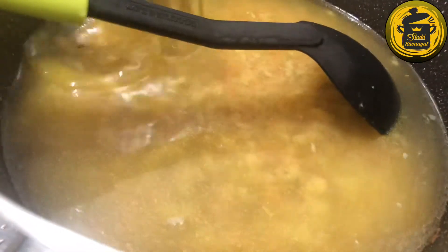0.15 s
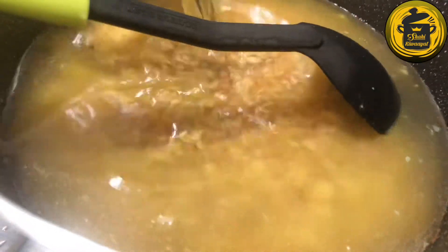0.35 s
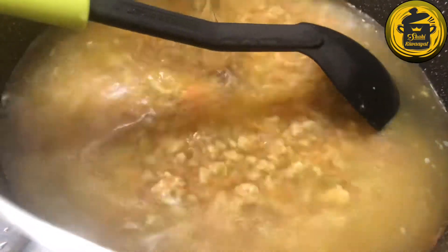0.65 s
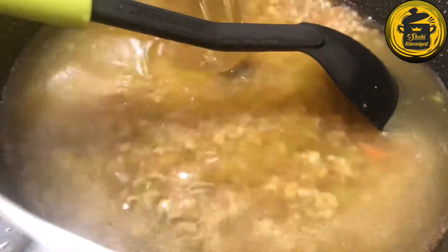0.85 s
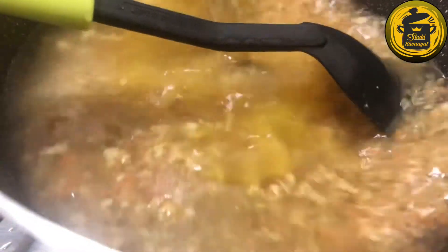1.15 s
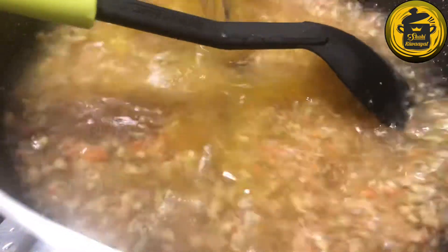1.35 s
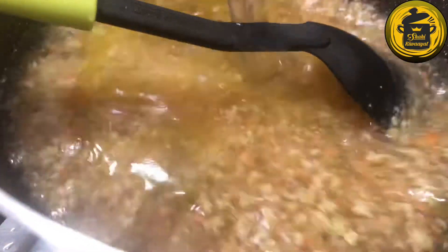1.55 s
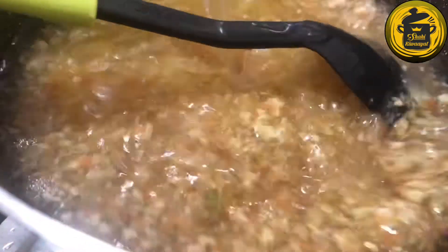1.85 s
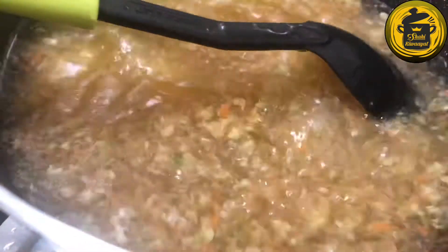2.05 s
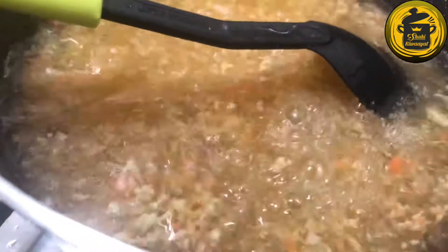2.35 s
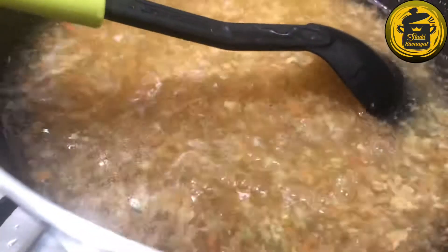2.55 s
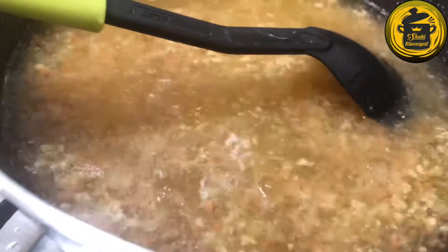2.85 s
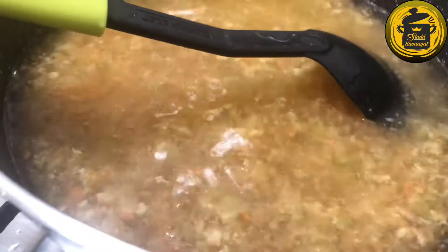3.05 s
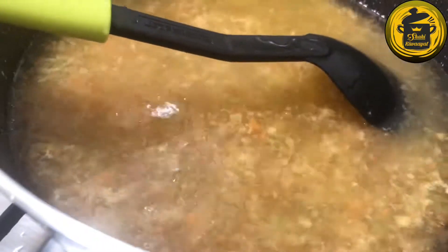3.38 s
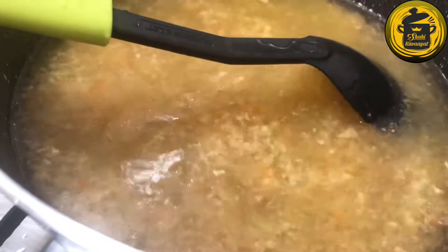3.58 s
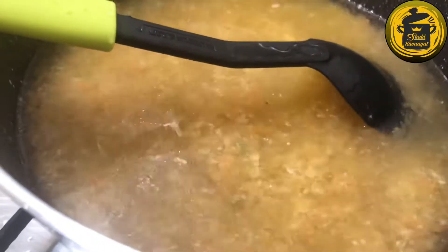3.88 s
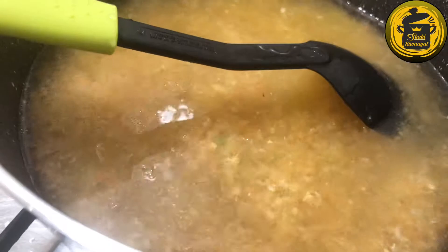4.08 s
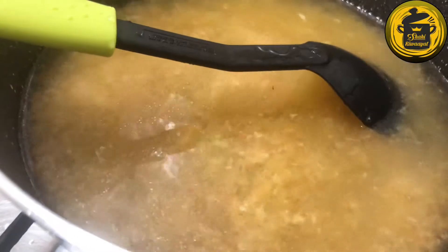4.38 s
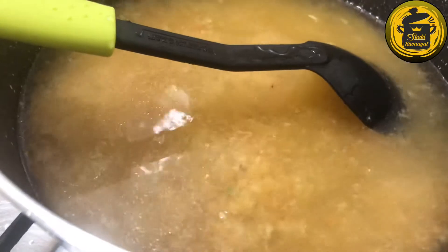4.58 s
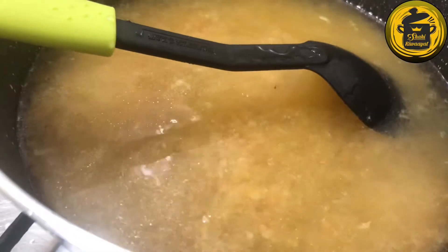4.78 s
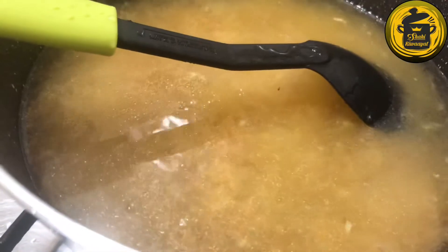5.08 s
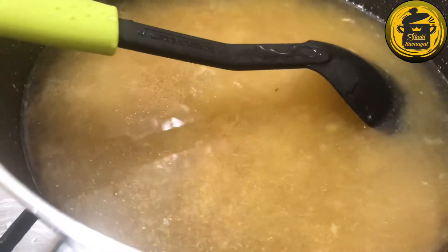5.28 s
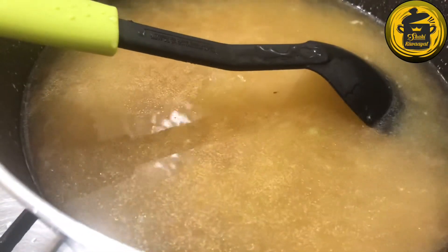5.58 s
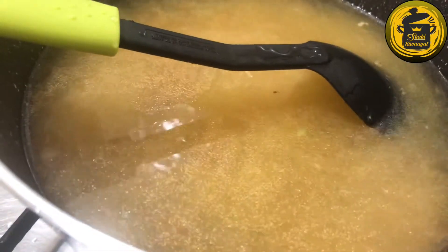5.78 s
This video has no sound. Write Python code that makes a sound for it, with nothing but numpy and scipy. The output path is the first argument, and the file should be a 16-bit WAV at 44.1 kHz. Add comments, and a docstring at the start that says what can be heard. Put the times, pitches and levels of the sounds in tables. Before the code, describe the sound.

In a small kitchen, water is poured into a wide pot of soup close to the microphone. It starts as a spattering trickle, eases, then comes in one heavy, bubbling gush that makes the pot boom softly before fizzing out. Afterwards, things are set down and knocked on the worktop beside the pot. A fan and burner rumble and hiss steadily underneath.

```python
"""A small kitchen, microphone close to a wide pot of soup. Water is poured in: a trickle, one heavy gush,
a fizzing end. Bubbles ring, droplets snap, the pot booms under the stream, and the walls answer briefly.
Afterwards things are set down and knocked on the worktop beside the pot.
The rumble and hiss of a fan and burner lie under it all."""
import sys
import numpy as np
from scipy import signal
from scipy.fft import rfft, irfft
from scipy.io import wavfile

SR = 44100
rng = np.random.default_rng(int(sys.argv[2]) if len(sys.argv) > 2 else 0)


def to_wav(sig):
    """Store sig (one row per channel, or 1-D mono) as 16-bit WAV at the path in sys.argv[1].

    Samples outside -1..1 are clipped; the rate is SR.
    """
    pcm = np.clip(np.atleast_2d(sig), -1, 1) * 32767
    pcm = np.round(pcm).astype(np.int16)
    wavfile.write(sys.argv[1], SR, pcm.T)  # frames by channels


N = 261513

# the course of the pour: (time [s], bubble bed [dB], spray [dB])
POUR = [(0.04, -82, -89), (0.1, -66, -49), (0.14, -46.5, -52), (0.185, -39.5, -31.5), (0.29, -50, -58),
        (0.55, -51, -46), (0.63, -59, -66), (0.71, -50, -51.5), (0.77, -65.5, -59.5), (1.488, -58.5, -56),
        (1.549, -35, -32), (1.72, -32, -39.5), (1.871, -41.5, -40.5), (1.9, -66, -47.5), (2.05, -79, -55),
        (2.1, -53, -49), (2.56, -64, -50), (2.64, -86, -53.5)]
GUSH_START_S, GUSH_END_S = 1.5, 1.9


def from_db(db):
    """Decibels to gain."""
    return 10 ** (np.asarray(db) / 20)


def rms_one(x):
    """Scale to unit rms."""
    return x / np.sqrt(np.mean(x ** 2) + 1e-20)


def at_hz(points, hz):
    """Read a spectrum on a log-frequency axis."""
    points_hz, points_db = np.transpose(points)
    return np.interp(np.log(hz), np.log(points_hz), points_db)


def band(x, low_hz, high_hz):
    """Butterworth band-pass."""
    sos = signal.butter(2, [low_hz, min(high_hz, SR * .45)], "band", fs=SR, output="sos")
    return signal.sosfilt(sos, x)


def wander(low_hz, high_hz):
    """Random motion of unit rms between two rates."""
    return rms_one(band(rng.standard_normal(N), low_hz, high_hz))


def ring(clicks, hz, t60):
    """A unit click sets a sine of height 1 ringing."""
    r, w = from_db(-60 / (t60 * SR)), 2 * np.pi * hz / SR
    return signal.lfilter([0, np.sin(w)], [1, -2 * r * np.cos(w), r * r], clicks + 1e-18)


def add(out, s, sound):
    """Mix a short sound in at time s."""
    at = round(s * SR)
    out[at:at + len(sound)] += sound[:N - at]


def fan_and_burner(noise_db=-47.5):
    """Room tone: steady rumble and hiss with broad resonances, and a slightly wavering motor hum."""
    # noise spectrum: (frequency [Hz], relative density [dB])
    spectrum = [(15, -57), (25, -23), (80, -0.5), (141, -4.5), (166, -8.5), (293, -7), (463, -23),
                (531, -16), (863, -20.5), (1560, -12.5), (2160, -25.5), (4610, -40), (11000, -41),
                (12900, -31.5), (16000, -45)]
    # its resonances and one dip: (centre [Hz], width [Hz], gain [dB])
    resonances = [(129.5, 9.1, 5.5), (275, 20, -5.5), (1230, 160, 5), (1587, 153, 6.5), (3880, 460, 7),
                  (4525, 980, 14), (5530, 900, 10.5), (7500, 220, 9), (9400, 300, 7), (10230, 370, 10),
                  (11900, 220, 1)]
    # motor hum: (frequency [Hz], rms level [dB])
    motor_lines = [(50, -63), (75, -55.5), (100, -58)]
    hz, t = np.maximum(np.fft.rfftfreq(N, 1 / SR), 1), np.arange(N) / SR
    bumps_db = sum(db * np.exp(-(2 * (hz - centre) / width) ** 2) for centre, width, db in resonances)
    colour = from_db(at_hz(spectrum, hz) + bumps_db)
    out = from_db(noise_db) * rms_one(irfft(rfft(rng.standard_normal(N)) * colour, N))
    for line_hz, line_db in motor_lines:
        out += np.sqrt(2) * from_db(line_db) * np.sin(2 * np.pi * line_hz * t + 1.4 * wander(1, 4.8))
    return out


def flow_db(gulp_t60=0.042, fade_db_per_s=33):
    """Levels of bubble bed and spray: the pour's slow course, fading at its end, plus short gulps."""
    # the gush breaks up into gulps: (time [s], bubble bed [dB], spray [dB])
    gulps = [(1.775, -38, -27), (1.917, -26, -34), (1.967, -29.5, -31), (2.036, -53, -59)]
    t = np.arange(N) / SR
    times, *levels = np.transpose(POUR)
    fade_db = fade_db_per_s * np.maximum(t - times[-1], 0)
    power = np.array([from_db(2 * (np.interp(t, times, db) - fade_db)) for db in levels])
    for s, *gulp_db in gulps:
        decay_db = 60 * np.maximum(t - s, 0) / gulp_t60
        power += (t > s) * from_db(2 * (np.c_[gulp_db] - decay_db))
    return 10 * np.log10(power)


def grains(per_s, spread_db, low_hz, high_hz, cycles):
    """Random clicks of uneven size ring 24 resonators: (pitch, sound) pairs."""
    sizes = from_db(spread_db * np.minimum(rng.exponential(1, N), 4)) * rng.choice([-1, 1], N)
    clicks = sizes * (rng.random(N) < per_s / SR)
    resonator = rng.integers(0, 24, N)
    for k, hz in enumerate(np.geomspace(low_hz, high_hz, 24)):
        struck = ring(clicks * (resonator == k), hz, cycles / hz)
        yield hz, rms_one(ring(struck, hz, cycles / hz / 3))   # ringing twice softens the start


def stream(bed_db, spray_db):
    """Water meets soup: a bed of many small bubbles below, fine spray and hiss above."""
    # spray spectrum: (frequency [Hz], relative density [dB])
    spectrum = [(1470, -30), (2500, 6), (3460, -23), (4690, -1.5), (5110, -4.5), (7080, -3), (11500, -14.5),
                (16000, -8)]
    fizz = grains(per_s=1600, spread_db=5.0, low_hz=607, high_hz=4106, cycles=59.0)
    bed = rms_one(sum(from_db(2.4 * np.log2(hz / 1000)) * sound for hz, sound in fizz))
    drops = grains(per_s=4000, spread_db=3.6, low_hz=3060, high_hz=15700, cycles=12.0)
    spray = rms_one(sum(from_db(at_hz(spectrum, hz)) * np.sqrt(hz) * sound for hz, sound in drops))
    crackle = rng.standard_normal(N) * from_db(4.4 * wander(17, 330))
    spray = rms_one(spray + from_db(-4) * rms_one(band(crackle, 4500, 15500)))
    spray = rms_one(spray * from_db(4.2 * wander(5, 40)))   # drops come in clusters
    return from_db(bed_db) * bed + from_db(spray_db) * spray


def small_events(level_db, end_s, count, above_db, low_hz, high_hz):
    """Chance rows (time [s], level [dB], pitch [Hz]), up to above_db over the level of the flow."""
    when, size, pitch = rng.random((count, 3)).T
    start_s = POUR[1][0]
    times = start_s + when * (end_s - start_s)
    levels = level_db[(times * SR).astype(int)] + above_db - 8 * size
    return list(zip(times, levels, low_hz * (high_hz / low_hz) ** pitch))


def droplets(spray_db):
    """A bursting droplet is a millisecond puff of noise in its own band, longer and wetter in the gush."""
    # loud droplets: (time [s], peak [dB], centre [Hz])
    loud = [(0.087, -27.5, 7500), (0.147, -21, 6500), (0.184, -13.5, 8200), (0.19, -11, 8450),
            (0.239, -26, 6800), (0.251, -20.5, 8250), (0.355, -21.5, 10100), (0.391, -28.5, 6300),
            (0.464, -30, 9000), (0.501, -27, 7000), (0.558, -26, 11900), (0.587, -28, 7300),
            (0.641, -31.5, 6200), (0.677, -37, 11200), (0.686, -33, 12700), (0.703, -34, 7900),
            (0.717, -32.5, 7800), (0.755, -33, 11000), (0.781, -30.5, 11900), (1.081, -36, 8260),
            (1.135, -28, 6670), (1.144, -33, 11000), (1.161, -39, 11700), (1.23, -38, 9700),
            (1.315, -38, 11700), (1.334, -32, 8300), (1.456, -32.5, 11900), (1.544, -24, 6000),
            (1.592, -23, 9400), (1.605, -18, 7700), (1.662, -22, 8200), (1.675, -16, 5900),
            (1.71, -25, 7060), (1.719, -19, 6200), (1.729, -19, 6840), (1.738, -18.5, 8100),
            (1.773, -15.5, 7100), (1.826, -26, 8500), (1.853, -35, 8300), (1.876, -24, 6900),
            (1.928, -25, 8440), (1.969, -23, 10900), (2.017, -31, 13100), (2.037, -17, 11700),
            (2.156, -25.5, 12000), (2.204, -27.5, 7500), (2.273, -31, 7400), (2.552, -33, 8700)]
    rows = loud + small_events(spray_db, end_s=2.9, count=170, above_db=13.5, low_hz=6000, high_hz=13400)
    out, noise = np.zeros(N), rng.standard_normal((len(rows), 600))
    t_ms = np.arange(600) / SR * 1000 - 5
    for (s, db, hz), white in zip(rows, noise):
        spread_ms, octaves = (1.6, 0.67) if GUSH_START_S < s < GUSH_END_S else (0.71, 0.68)
        half_band = 2 ** (octaves / 2)
        envelope = np.exp(-.5 * (t_ms / spread_ms) ** 2)
        puff = band(white, hz / half_band, min(hz * half_band, 14500)) * envelope
        add(out, s - .005, from_db(db) * puff / np.abs(puff).max())
    return out


def bubbles(bed_db, rise=0.011, attack_cycles=1.83):
    """Each bubble is a damped sine whose pitch climbs a little; the churning surface makes it wobble."""
    # loud bubbles: (time [s], level [dB], pitch [Hz])
    loud = [(0.1, -34.5, 5300), (0.122, -34.5, 2880), (0.132, -29, 1890), (0.134, -28.5, 2840),
            (0.163, -32, 1980), (0.181, -25, 4290), (0.183, -26, 5700), (0.217, -26, 2790),
            (0.225, -24, 4890), (0.235, -35.5, 1080), (0.29, -43.5, 646), (0.335, -38, 1860),
            (0.345, -36, 2780), (0.365, -35.5, 2680), (0.412, -34, 4530), (0.456, -35, 2690),
            (0.48, -32, 2840), (0.504, -30.5, 3484), (0.518, -30.5, 5290), (0.557, -34, 1086),
            (0.673, -41, 1157), (0.674, -36.5, 2600), (0.706, -29.5, 3790), (0.751, -40.5, 1900),
            (0.961, -43.5, 2890), (1.068, -42.5, 3040), (1.114, -36.5, 3400), (1.116, -36.5, 4840),
            (1.233, -42.5, 2830), (1.3, -37, 5300), (1.301, -40.5, 2160), (1.435, -33.5, 2640),
            (1.521, -29, 2680), (1.529, -25, 2930), (1.543, -35.5, 800), (1.552, -20, 1115),
            (1.555, -16, 1412), (1.569, -21.5, 1547), (1.573, -23, 2820), (1.581, -20, 1566),
            (1.613, -21, 3110), (1.625, -24, 1875), (1.629, -18, 5356), (1.643, -19.5, 2080),
            (1.679, -30, 1140), (1.703, -22, 2193), (1.713, -18.5, 2136), (1.717, -16, 4800),
            (1.721, -17, 4500), (1.725, -20.5, 2600), (1.729, -22, 1980), (1.756, -19, 1090),
            (1.767, -19, 2005), (1.775, -11.5, 4670), (1.798, -27, 2140), (1.799, -15, 4720),
            (1.838, -24, 4560), (1.848, -35, 2155), (1.869, -22.5, 5200), (1.87, -36, 2730),
            (1.877, -19, 4670), (1.916, -28.5, 686), (1.92, -30, 1270), (1.927, -25, 6260),
            (1.967, -26.5, 4380), (1.967, -27, 977), (1.979, -22, 2900), (1.996, -28.5, 1230),
            (2.036, -30, 1102), (2.039, -28, 790)]
    out = np.zeros(N)
    churn = rms_one(band(rng.standard_normal((2, N)), 38, 376))
    small = small_events(bed_db, GUSH_END_S, count=70, above_db=9, low_hz=1894, high_hz=5530)
    for s, db, hz in loud + small:
        t60 = max(53 - (db + 25.5), 12) / hz   # violent bubbles die sooner: one cycle less per dB
        t = np.arange(int(t60 * SR)) / SR
        sway, flutter = churn[:, round(s * SR + hz):][:, :len(t)]
        wobble_rad = 0.57 if GUSH_START_S < s < GUSH_END_S else 0.12
        phase = 2 * np.pi * hz * (t + rise * t * t / t60) + wobble_rad * sway
        swell = (1 - np.exp(-t * hz / attack_cycles)) * from_db(-60 * t / t60)
        add(out, s - .001, from_db(db + 2.63 * flutter) * swell / swell.max() * np.sin(phase))
    return out


def pot():
    """Slugs of water strike the lowest modes of the full pot; the sloshing makes the ring flutter."""
    # slugs of water: (time [s], strength [dB], upper mode relative to that [dB])
    slugs = [(0.191, -27.5, 4), (1.552, -41.5, -7), (1.599, -41.5, -1), (1.737, -29.5, 3.5),
             (1.789, -36, 5.5), (1.83, -36, 3), (1.92, -35, -12), (1.977, -49, -17)]
    # pot modes, a split pair and an upper one: (frequency [Hz], t60 [s])
    modes = [(318, 0.28), (335, 0.23), (525, 0.069)]
    low, high = np.zeros((2, N))
    for s, db, upper_db in slugs:
        low[round(s * SR)] = from_db(db)
        high[round(s * SR)] = from_db(db + upper_db)
    boom = ring(low, *modes[0]) - 0.53 * ring(low, *modes[1]) + ring(high, *modes[2])
    slosh = from_db(2.5 * wander(15, 60))
    return band(boom * slosh, 160, 800)   # water is a soft hammer


def kitchen_reflections(x, t60=0.27, level_db=-15.5):
    """Near walls: dense reflections dying at the room's rate, duller than the direct sound."""
    t = np.arange(int(t60 * SR)) / SR
    echo = band(rng.standard_normal(len(t)), 290, 5400) * from_db(-60 * t / t60) * (t > .004)
    return from_db(level_db) * signal.fftconvolve(x, echo / np.linalg.norm(echo))[:N]


def knocks(contact_s=0.0031, first_click=3.7, favour_db=14.5):
    """A rattling contact rings the worktop modes; scattered noise dies away in each band."""
    # blows: (time [s], level [dB], extra thud of a heavy object [dB], extra hollow ring [dB],
    # extra edge of a hard contact [dB], low and high note favoured by where the blow lands [Hz])
    blows = [(2.662, -36, -4.5, -1, -3, 320, 1130), (2.682, -44, -1.5, 6.5, 11.5, 796, 4000),
             (2.803, -47.5, -5, 5, -1, 651, 1120), (3.015, -53.5, 1, 7.5, 4.5, 646, 3220),
             (3.612, -46.5, -6, 5.5, -5, 815, 1130), (3.75, -60.5, 12, 5, 1.5, 412, 1590),
             (3.806, -31, -7.5, -5.5, -1, 306, 1210), (4.403, -57.5, 1, 6, -21, 296, 1070),
             (5.215, -48, 10.5, -2.5, -4, 217, 1090), (5.69, -43, 4, -1.5, -1.5, 238, 1800),
             (5.739, -54.5, 11, 1, -8, 250, 1800), (5.809, -57.5, 2, 5, -8, 366, 993)]
    # modes of the worktop and what stands on it: (frequency [Hz], level [dB], t60 [s])
    worktop = [(130, -4, .4), (250, -1, .4), (305, 0, .18), (410, -4, .15), (650, -3, .25), (840, -7, .2),
               (1110, -1, .26), (1150, -5, .15), (1350, -1, .2), (2290, -6, .22), (2570, -3, .1),
               (3200, -8, .08), (4000, -6, .08)]
    # the usual knock, band by band: (level [dB], shares of the extra thud, hollow ring and edge [ratio])
    colour = [(-9, 0.86, 0.22, 0), (-0.5, 0.39, 0, 0.16), (-3, 0, 0.82, 0.25), (0, 0.18, 0, 0.16),
              (-7, 0, 0.074, 0.62), (-10.5, 0, 0, 1.21), (-23.5, 0.087, 0, 1.4)]
    # limits of those seven bands: (frequency [Hz])
    limits_hz = [90, 200, 480, 950, 1900, 3300, 6000, 12500]
    tail_t60, scatter_db = (.35, .3, .24, .24, .22, .22, .18), (-4, -7, -6, -8, -3, 1)   # by band
    out, t = np.zeros(N), np.arange(int(.4 * SR)) / SR
    noise = rng.standard_normal((len(blows), 2, len(t)))
    onset = 1 - np.exp(-t / (0.083 * contact_s))
    for (s, db, thud_db, hollow_db, edge_db, *notes), (rattle, scatter) in zip(blows, noise):
        touch = (rattle + first_click * (t == 0)) * np.exp(-t / contact_s)
        modes = 0
        for k, (hz, mode_db, t60) in enumerate(worktop):
            nearness = np.exp(-(np.log(hz / np.array(notes)) / .12) ** 2).max()
            modes += from_db(mode_db + favour_db * nearness) * ring(touch, hz, t60) * (-1) ** k
        for k, (usual_db, *shares) in enumerate(colour):
            low, high = limits_hz[k:k + 2]
            band_noise = band(band(scatter, low, high), low, high)
            part = rms_one(band_noise * onset * from_db(-60 * t / tail_t60[k]))
            if k < 6:   # no modes stand out at the very top
                scatter_gain = from_db(scatter_db[k] + .5 * thud_db)   # heavy objects damp the modes
                part = rms_one(rms_one(band(modes, low, high)) + scatter_gain * part)
            band_db = usual_db + np.dot(shares, [thud_db, hollow_db, edge_db])
            add(out, s, from_db(db + band_db) * part)
    return out


def scene():
    """One microphone: water close up, knocks beside it, room tone behind."""
    bed_db, spray_db = flow_db()
    water = stream(bed_db, spray_db) + bubbles(bed_db) + droplets(spray_db) + pot()
    return (water + kitchen_reflections(water) + knocks() + fan_and_burner())[None]


def record(dry, low_cut_hz=40, high_cut_hz=15780):
    """The small microphone loses the deepest bass; the top is cut steeply."""
    thin = signal.sosfilt(signal.butter(2, low_cut_hz, "high", fs=SR, output="sos"), dry)
    return signal.sosfilt(signal.ellip(14, .5, 70, high_cut_hz, fs=SR, output="sos"), thin)


dry = scene()
out = record(dry)
to_wav(out)
```